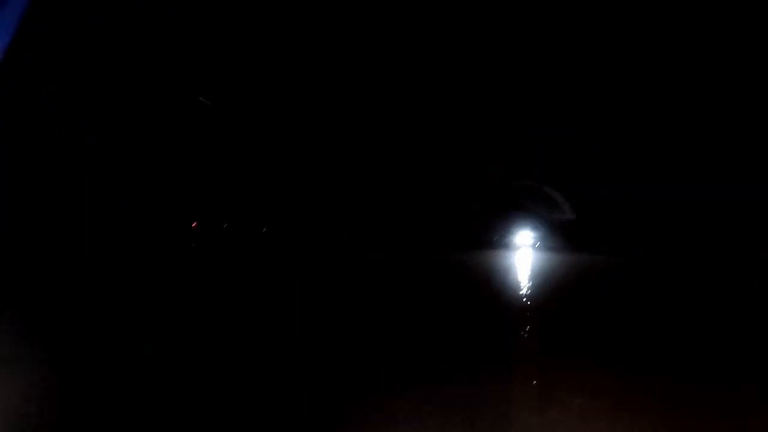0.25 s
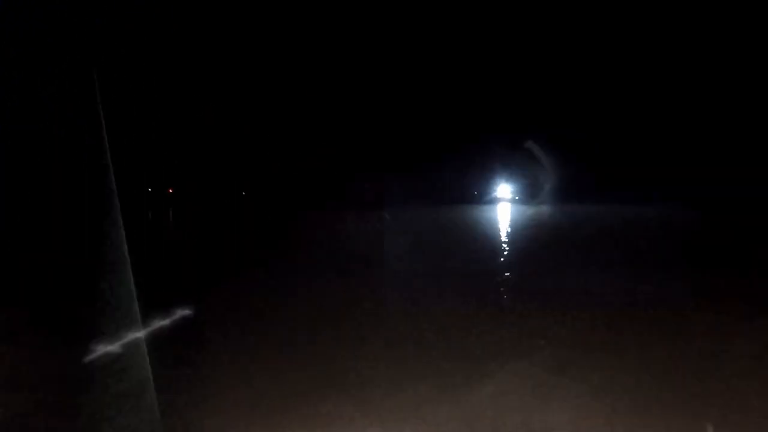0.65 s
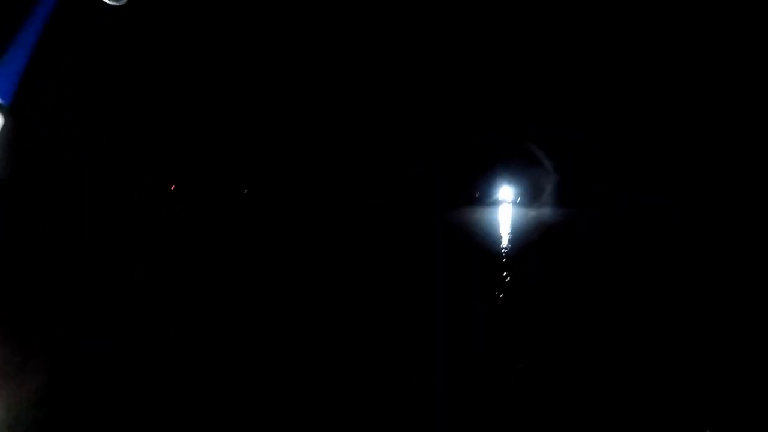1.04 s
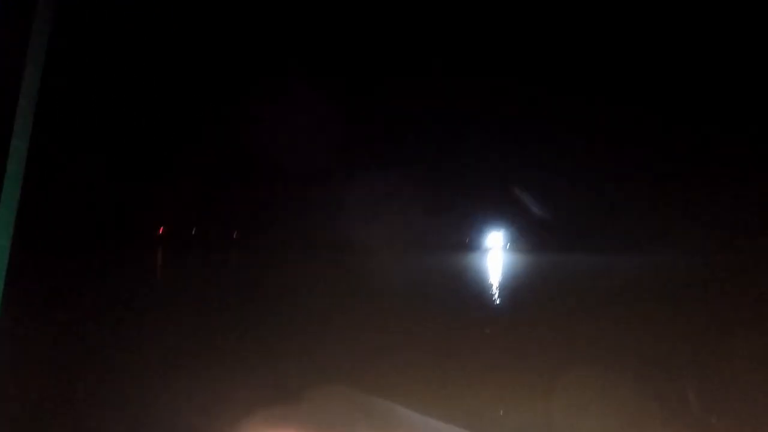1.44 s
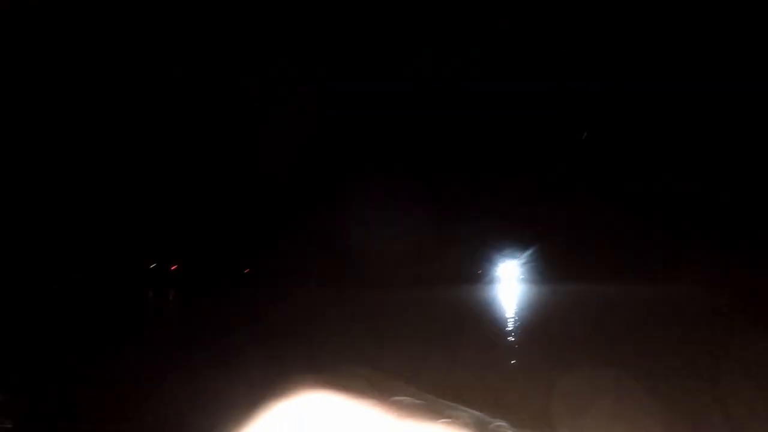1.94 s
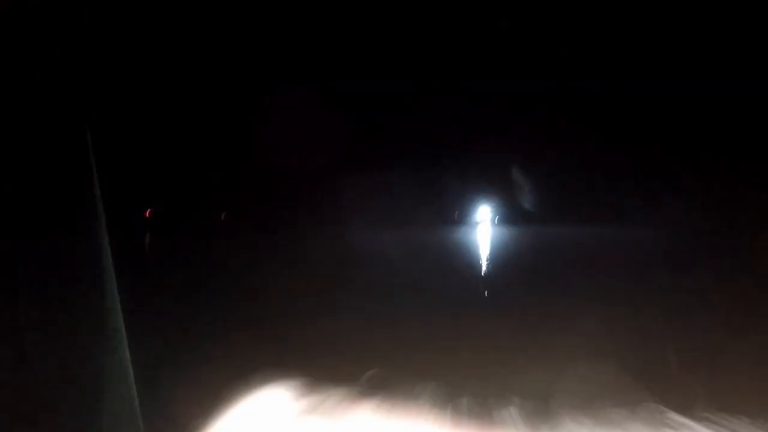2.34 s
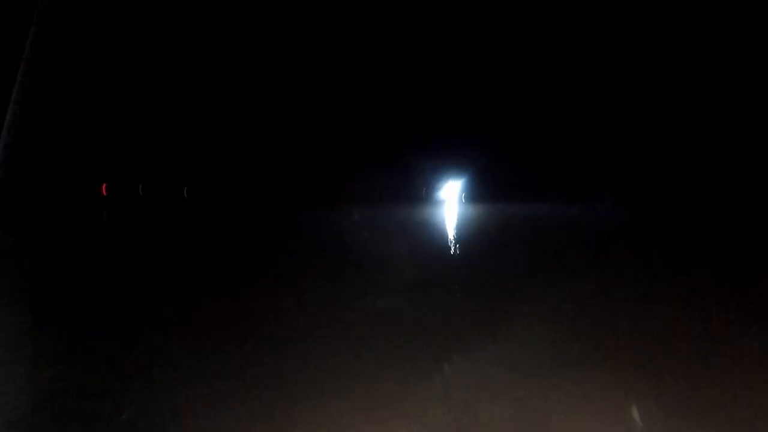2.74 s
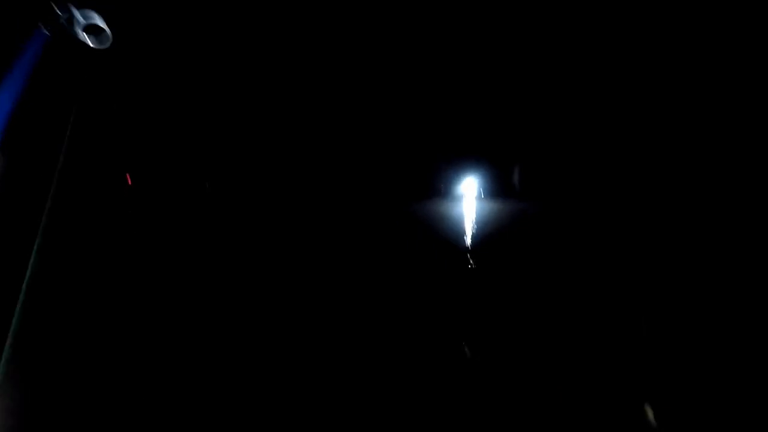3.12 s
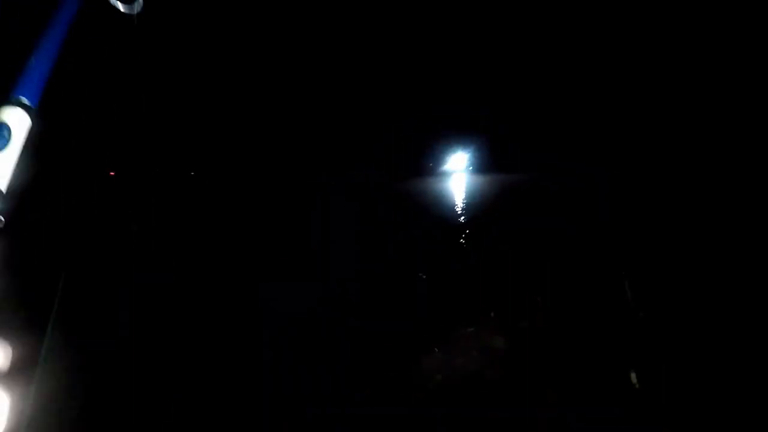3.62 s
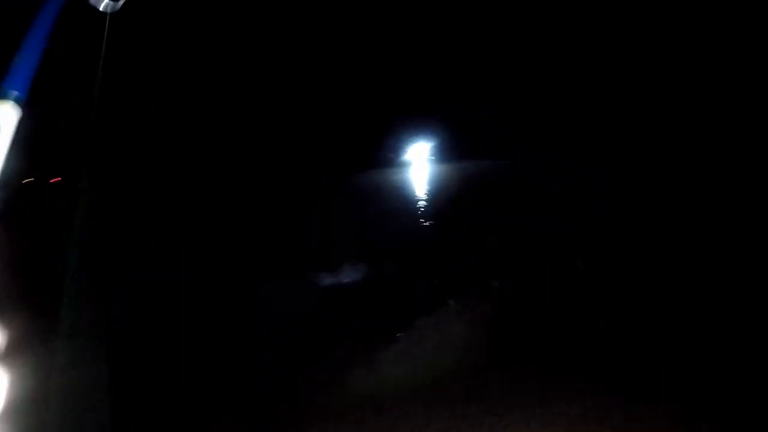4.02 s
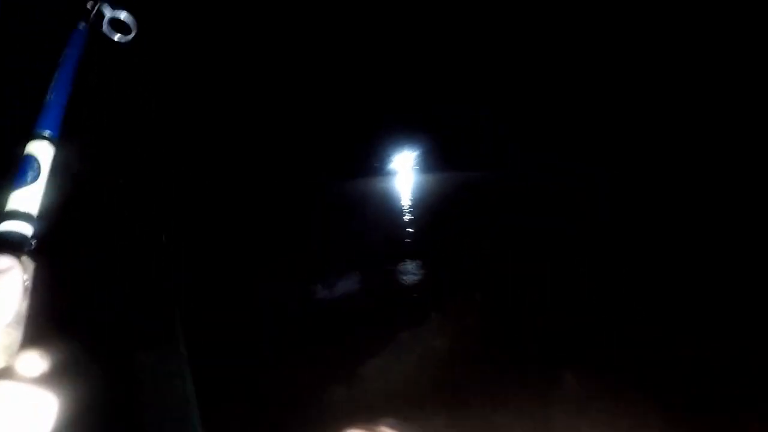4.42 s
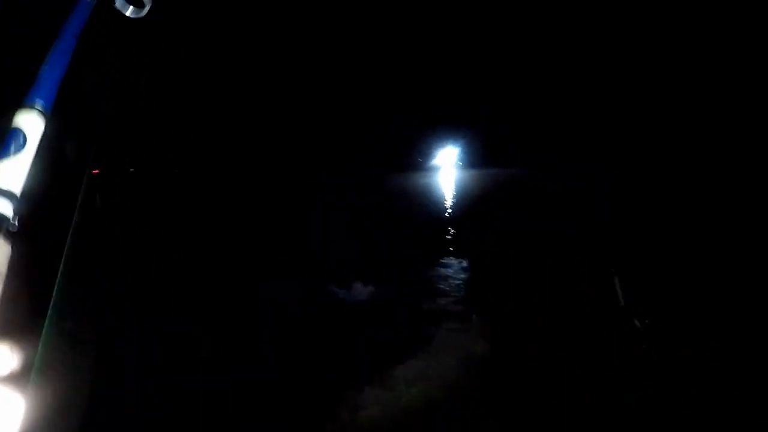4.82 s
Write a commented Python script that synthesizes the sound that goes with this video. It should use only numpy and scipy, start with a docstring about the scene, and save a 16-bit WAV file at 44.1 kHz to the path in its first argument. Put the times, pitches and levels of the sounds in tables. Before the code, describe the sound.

Outdoors at night by the water, bright thin metal chatter from a reel dominates, with line hissing softly through the rod rings. Fingers scuff and bump the camera, low and muffled. Sharp catches snap singly at first, more often after three seconds. In the last second or so, bubbles plop, wavelets lap and drops trickle. Behind lie a steady beating boat hum, a high insect drone and slight low wind puffs.

```python
"""A fishing reel is wound close by at night: its loose metal parts chatter as decaying modes, its catches snap.
Line hisses through the rod rings as grainy noise and the spool squeals once in two wavering tones.
Fingers scuff and knock a hand-held camera; water plips, laps and trickles at the bank as rising bubbles.
Behind, a far boat engine hums in beating tones, insects drone high as filtered noise, and a breeze puffs."""
import sys
import numpy as np
from scipy.fft import rfft, irfft, next_fast_len
from scipy.io import wavfile
from scipy.ndimage import map_coordinates

SR = 44100
rng = np.random.default_rng(int(sys.argv[2]) if len(sys.argv) > 2 else 0)


def digitize_waveform(pressure):
    """Quantize a signal to 16-bit integers and store it at the path in sys.argv[1].

    Rows of a 2-D input are taken as channels; values are limited to [-1, 1].
    """
    field = np.atleast_2d(pressure).T
    bounded = np.clip(field, -1, 1)
    quanta = np.round(bounded * 32767).astype(np.int16)
    wavfile.write(sys.argv[1], SR, quanta)


N = 223399


def amp(db):
    """Decibels to gain."""
    return 10 ** (np.asarray(db) / 20)


def unit(x):
    """Scale to rms 1."""
    return x / np.sqrt(np.mean(x ** 2) + 1e-20)


def along(points, hz):
    """Interpolate (Hz, value) points on a log frequency axis."""
    f, v = np.transpose(points)
    return np.interp(np.log(hz + 1), np.log(f + 1), v)


def wobble(knots_per_s):
    """Smooth random curve through normal-distributed knots."""
    knots = rng.standard_normal(int(N * knots_per_s / SR) + 4)
    return map_coordinates(knots, [np.arange(N) * knots_per_s / SR])


def filtered(x, response):
    """Apply a gain that is a function of frequency in Hz."""
    n = x.shape[-1]
    m = next_fast_len(2 * n)
    return irfft(rfft(x, m) * response(np.fft.rfftfreq(m, 1 / SR)), m)[..., :n]


def rush(spectrum, alike, grain_db=0):
    """Shaped stereo noise of rms 1, left-right correlation set by alike; grain_db makes the level flutter."""
    pair = rng.standard_normal((2, N)) * amp(grain_db * wobble(400))

    def mid_side_gain(hz):
        turn = np.arccos(np.clip(along(alike, hz), -1, 1)) / 2
        return amp(along(spectrum, hz)) * [np.cos(turn), np.sin(turn)]

    mid, side = filtered(pair, mid_side_gain)
    return unit(np.array([mid + side, mid - side]))


def fade(t, t60):
    """Free decay by 60 dB in t60 seconds."""
    return np.exp(-np.log(1000) * t / t60)


def swell(s, rise_s, fall_s):
    """Envelope that climbs as a half bell to 1 at time s, then decays exponentially."""
    t = np.arange(N) / SR - s
    return np.exp(-(np.minimum(t, 0) / rise_s) ** 2 - np.maximum(t, 0) / fall_s)


def humps(rows):
    """Sum of bells from rows of centre in seconds, level in dB, half length to 1/e in seconds."""
    t = np.arange(N) / SR
    return sum(amp(db) * np.exp(-((t - s) / length_s) ** 2) for s, db, length_s in rows)


def add(out, s, sound, pan_db=0):
    """Mix a short sound into the stereo track at time s; pan_db is left minus right."""
    part = out[:, max(round(s * SR), 0):][:, :sound.shape[-1]]
    part += (sound * amp([[pan_db / 2], [-pan_db / 2]]))[:, :part.shape[1]]


def winding_effort_db():
    """Relative briskness of the winding, which drives loose chatter and line hiss."""
    # Each row: time in seconds, relative effort in dB.
    winding = [(0.0, -37), (0.32, -33), (0.61, -32.5), (1.17, -31.5), (1.52, -43), (1.81, -50),
               (2.12, -35.5), (2.41, -30.5), (2.64, -30), (2.89, -32), (3.27, -32.5), (3.47, -31.5),
               (3.68, -32.5), (3.85, -44), (3.94, -41), (4.17, -33), (4.36, -31.5), (4.74, -38),
               (5.07, -32)]
    s, effort_db = np.transpose(winding)
    return np.interp(np.arange(N) / SR, s, effort_db)


def brief_dips(depth_db=-21):
    """Gain with brief dips for the rattle and line hiss, some just after a loud knock or snap."""
    # Each row: centre in seconds, half length in seconds.
    dips = [(0.186, 0.019), (0.349, 0.0063), (2.341, 0.015), (2.962, 0.0082), (3.247, .009), (3.513, 0.019),
            (3.613, 0.013), (4.06, 0.017), (4.125, 0.0076)]
    return amp(depth_db * humps([(s, 0, length_s) for s, length_s in dips]))


def clink(centre_hz, focus_db=11, scatter_db=3, port_spread=0.23):
    """One metal contact of peak 1: the spot struck favours the modes near centre_hz."""
    # Modes of the reel. Each row: frequency in Hz, relative level in dB, t60 in seconds.
    metal = [(3768, -10.5, 0.053), (4047, -9.5, 0.094), (4287, 4, 0.012), (4770, 1, 0.017),
             (5210, -14.5, 0.0091), (5960, -5.5, 0.0091), (6380, -6, 0.061), (7310, -6, 0.0083),
             (9530, -22.5, 0.065), (12200, -30, 0.04), (12860, -38, 0.05), (14400, -46, 0.04)]
    t = np.arange(SR // 20) / SR
    hz, db, t60 = np.transpose(metal)[:, :, None]
    size, detune, phase, skew = rng.standard_normal((4, len(metal), 1))
    gain = amp(db + scatter_db * size + focus_db * np.exp(-((hz - centre_hz) / 450) ** 2))
    # parts seat differently each time; heavily damped modes shift most
    seat_spread_hz = 22 + 260 * np.exp(-t60 / 0.028)
    angle = 2 * np.pi * ((hz + detune * seat_spread_hz) * t + phase)
    ring = gain * fade(t, t60) * (1 - np.exp(-(t / 0.0004) ** 2))
    pair = np.array([np.sum(ring * np.sin(angle + side * port_spread * skew), 0) for side in (1, -1)])
    return pair / np.abs(pair.mean(0)).max()


def reel():
    """Loose parts chatter with the winding; at each jolt one strikes hard, bounces and shakes the rest."""
    # Each row: time in seconds, peak in dB, strongest frequency in Hz.
    jolts = [(0.033, -21.5, 4900), (0.098, -26, 4080), (0.2285, -21, 4050), (0.3845, -18.5, 3940),
             (0.4207, -20.5, 4020), (0.4498, -25, 4020), (0.476, -22.5, 4830), (0.4812, -17, 4040),
             (0.5413, -13, 4000), (0.6207, -14, 4060), (0.6759, -13.5, 4570), (0.7147, -26.5, 4100),
             (0.7263, -12.5, 4100), (0.741, -20.5, 6260), (0.752, -20, 6160), (0.7818, -19, 4150),
             (0.835, -11.5, 4100), (0.9003, -21.5, 4030), (0.9369, -20.5, 6600), (0.975, -21.5, 6400),
             (0.993, -18.5, 3900), (1.0119, -22, 3950), (1.0173, -17.0, 3780), (1.0265, -25, 3830),
             (1.0612, -19, 4040), (1.105, -24.5, 4060), (1.1433, -20, 4060), (1.1557, -16, 4600),
             (1.1633, -15, 4400), (1.2054, -23.5, 4040), (1.216, -20.0, 4050), (1.249, -23, 4020),
             (1.2579, -13.5, 4050), (1.2668, -21, 4400), (1.28, -19, 4300), (1.331, -19, 4120),
             (1.3692, -19.5, 4100), (1.4497, -31, 4060), (1.483, -19.5, 4530), (1.503, -26.5, 4060),
             (1.5354, -27.0, 4040), (1.594, -31, 4160), (1.6315, -33, 4100), (1.6895, -29.5, 4130),
             (1.7188, -28.5, 4550), (1.7918, -23.5, 4060), (1.8097, -28.5, 4130), (1.84, -30, 4100),
             (1.9039, -28, 4670), (2.0102, -29, 4070), (2.1096, -23.5, 4060), (2.147, -25, 4180),
             (2.1865, -18.5, 4700), (2.2094, -20, 4970), (2.2517, -16.0, 4700), (2.2553, -17, 4140),
             (2.2677, -20, 4780), (2.3096, -16.5, 4180), (2.4014, -23, 4100), (2.43, -18, 4040),
             (2.4407, -12.5, 4950), (2.4925, -14.5, 4070), (2.5005, -20, 4690), (2.511, -24.5, 4080),
             (2.548, -10, 4900), (2.5917, -20.0, 4660), (2.5994, -17.5, 4860), (2.6264, -11.5, 6300),
             (2.6319, -11, 4770), (2.6397, -29, 4000), (2.6652, -22, 4090), (2.672, -16.5, 4870),
             (2.6766, -16.5, 4980), (2.6808, -19, 5000), (2.7044, -14.5, 4160), (2.7398, -18.5, 4020),
             (2.7507, -17, 3980), (2.767, -13.5, 5000), (2.7912, -12.5, 4610), (2.7956, -12, 4590),
             (2.7992, -17, 4940), (2.842, -18.5, 4100), (2.9335, -20, 3970), (2.9842, -20.5, 3900),
             (3.0356, -22, 4050), (3.049, -17, 4100), (3.0558, -18.5, 4060), (3.0926, -20, 4370),
             (3.0979, -17, 4230), (3.103, -17, 4700), (3.1173, -18.5, 4870), (3.1618, -21.5, 4050),
             (3.184, -21.5, 3990), (3.214, -17, 4200), (3.2319, -20.0, 4240), (3.2984, -23.5, 4060),
             (3.3343, -18.5, 4880), (3.39, -18, 4870), (3.4637, -22, 4480), (3.4743, -13.5, 4000),
             (3.486, -16, 4020), (3.5524, -18.5, 4730), (3.6318, -26, 4050), (3.642, -18, 4460),
             (3.6514, -16.5, 4000), (3.6692, -16.5, 4080), (3.755, -18.0, 3950), (3.839, -22, 4000),
             (3.9042, -21, 6440), (3.9137, -15.5, 4060), (3.9313, -14.5, 4330), (3.9356, -16.5, 4390),
             (3.9992, -17.5, 4260), (4.1499, -21.0, 4320), (4.1774, -12.5, 4570), (4.2244, -18, 4540),
             (4.2651, -15, 4400), (4.27, -14, 4640), (4.3145, -15.5, 4000), (4.39, -21, 4640),
             (4.4523, -17.5, 4570), (4.5675, -12.5, 4180), (4.6357, -20, 4060), (4.7583, -10, 4460),
             (4.9244, -19.5, 3830), (4.9579, -12.5, 4780)]
    chatter_db, uneven_db, uneven_knots_per_s = -5, 2, 28
    contacts_per_s, size_db = 560, 5.0
    flurry_db, flurry_rise_s, flurry_fall_s = -42.5, 0.0025, 0.014  # level after an average jolt
    flurry_db_per_jolt_db = 0.97
    bounce_db, bounce_gap_s = -10, 0.0046  # loss and mean flight time of each rebound
    busy_db = -30  # shaking with all parts in motion; contacts thin out below it
    low_edge_hz = 3500  # small parts radiate no lows

    ticks, chatter = np.zeros((2, 2, N))
    shaking = amp(winding_effort_db() + chatter_db + uneven_db * wobble(uneven_knots_per_s))
    average_db = np.mean(jolts, axis=0)[1]
    for s, db, hz in jolts:
        add(ticks, s, amp(db) * clink(hz))
        delays_s = np.cumsum(bounce_gap_s * (.5 + rng.random(2)))
        for k, delay_s in enumerate(delays_s, 1):
            add(ticks, s + delay_s, amp(db + k * bounce_db) * clink(hz))
        flurry = amp(flurry_db + flurry_db_per_jolt_db * (db - average_db))
        shaking = np.hypot(shaking, flurry * swell(s + bounce_gap_s, flurry_rise_s, flurry_fall_s))
    shaking = shaking * brief_dips()

    busy = np.minimum(shaking / amp(busy_db), 1)
    for when, size, spot, chance in rng.random((int(contacts_per_s * N / SR), 4)):
        share = busy[int(when * N)]
        if chance < share:
            contact = clink(3900 + 1100 * spot, focus_db=7.5)
            gain = amp(-size_db * np.log(size + 0.1)) / np.sqrt(share)
            add(chatter, when * N / SR, gain * contact)
    rattle = ticks + shaking * unit(chatter)
    return filtered(rattle, lambda hz: 1 / np.hypot(1, (low_edge_hz / (hz + 1)) ** 10))


def line():
    """Line hisses through the rings with the winding, more as it tightens and at each tug."""
    # Each row: frequency in Hz, relative density in dB per Hz.
    hiss = [(300, -32), (900, 2), (1300, -1.5), (2000, -2), (3000, -1.5), (4500, 5), (6500, 8), (8000, -5),
            (9700, -10), (11000, -27), (12800, -13), (14500, -44)]
    # Quick pulls. Each row: centre in seconds, level in dB before the trim, half length in seconds.
    tugs = [(.76, -39, 0.011), (1.07, -40.5, 0.013), (1.37, -41.5, 0.033), (2.06, -44, 0.086),
            (2.265, -38.5, 0.017), (2.72, -31.5, 0.017), (3.14, -46, 0.014), (3.72, -38, 0.017),
            (3.87, -38.5, 0.2), (4.22, -34, 0.059), (4.52, -39, 0.071), (4.96, -39.5, 0.051)]
    trim_db, running_db, effort_slope, tighten_db_per_s = 6, -49, 1.49, 1
    t = np.arange(N) / SR
    effort_db = winding_effort_db()
    effort_change_db = effort_slope * (effort_db - effort_db.mean())
    running = amp(running_db + effort_change_db + tighten_db_per_s * (t - t.mean()))
    level = np.hypot(running * brief_dips(), humps(tugs))
    return amp(trim_db) * level * rush(hiss, [(1000, 0.2)], grain_db=4.0)


def boat():
    """Neighbouring engine tones beat against each other over a soft rumble."""
    # Each row: frequency in Hz, mean level in dB rms.
    engine = [(155.4, -48), (161.5, -42), (174.3, -40.5), (183, -43.5), (257.1, -61.5), (366.1, -52),
              (484.5, -52.5), (604.9, -63.5), (968.3, -58), (983.8, -58), (1209.9, -61.5)]
    # Engine rumble and night air. Each row: frequency in Hz, relative density in dB per Hz.
    rumble = [(25, -38), (100, -56), (125, -14.5), (165, -3), (195, -5.5), (225, -6.5), (255, -11),
              (370, -9.5), (540, -13.5), (780, -20.5), (1100, -19), (1900, -26.5), (7000, -28),
              (11000, -48.5), (15000, -60)]
    # Each row: frequency in Hz, left-right correlation.
    air_alike = [(40, .3), (170, 1), (400, 0.68), (700, 0.027), (1200, 0.1), (9000, 0.06)]
    drift_hz, tone_wobble_db, rumble_db, rumble_wobble_db = 0.23, 2.32, -37, 1.1
    t = np.arange(N) / SR
    hum = np.zeros((2, N))
    for hz, db in engine:
        drift_cycles = np.cumsum(drift_hz * wobble(5.03)) / SR
        angle = 2 * np.pi * (hz * t + rng.random() + drift_cycles)
        level = np.sqrt(2) * amp(db + tone_wobble_db * wobble(4.126))
        hum += level * np.sin(angle + np.array([[.25], [-.25]]))
    return hum + amp(rumble_db + rumble_wobble_db * wobble(8.4)) * rush(rumble, air_alike)


def insects(level_db=-43, wobble_db=0.78):
    """A chorus of insects: high band noise with a slightly wavering level."""
    # Each row: frequency in Hz, relative density in dB per Hz.
    chorus = [(3300, -71), (4000, -50), (4700, -8), (5300, -20), (5900, 4.5), (6400, 0), (7100, -33),
              (9000, -50)]
    return amp(level_db + wobble_db * wobble(7.9)) * rush(chorus, [(6000, 0.022)])


def breeze(trim_db=-2, calm_db=-64):
    """Faint breeze on the microphone ports: low noise with puffs over a calm floor, trimmed together."""
    # Each row: centre in seconds, level in dB before the trim, half length in seconds.
    puffs = [(.1, -46.5, 0.82), (.84, -53, .06), (1.87, -52, 0.072), (2.7, -60, 0.37)]
    air = rush([(20, -2), (65, 5), (130, -5.0), (400, -58)], [(50, 0.46)])
    return amp(trim_db) * (amp(calm_db) + humps(puffs)) * air


def snaps():
    """Hard plastic catches: a sharp edge, then brief crackle with its own ring and body; harder is brighter."""
    # Each row: time in seconds, peak in dB, crackle t60 in seconds, pan L-R in dB, ring in Hz, low body in dB.
    catches = [(0.177, -12.5, 0.012, -1, 4330, 9.5), (0.8452, -15.5, 0.02, 0, 3300, 6),
               (1.3511, -5, 0.014, -1, 6600, -16), (2.383, -23, 0.023, -2, 3550, -9),
               (3.141, -10.5, 0.029, 0, 7100, 0.5), (3.266, -11, 0.036, 1, 5950, 5.5),
               (3.395, -8.5, 0.038, 4, 5760, 1.5), (3.465, -17, 0.046, 6, 3700, 7),
               (3.9687, -7.5, 0.014, 4, 5400, -2), (3.973, -7.5, 0.043, 1, 5500, -6),
               (4.0326, 0.5, 0.011, -3.5, 4300, 6), (4.1, -17, 0.024, 3, 5430, 5.5),
               (4.6513, -9, 0.027, 4, 5460, -1.5), (4.972, -7, 0.0077, 4, 5750, -11)]
    # Each row: frequency in Hz, relative density in dB per Hz.
    snap_tone = [(60, -29), (200, -7), (450, -11), (1000, -13), (3200, -3), (4200, 3), (6200, 5.5),
                 (7800, -5), (10300, -18.5), (11700, -39), (13000, -35), (15000, -40)]
    crackle, ring_db, ring_width_hz, body_hz = 0.39, 6, 450, 3000
    out, t = np.zeros((2, N)), np.arange(-SR // 200, SR // 25) / SR
    average_db = np.mean(catches, axis=0)[1]
    for s, db, t60, pan_db, ring_hz, body_db in catches:
        shared, left, right = rng.standard_normal((3, len(t)))
        grit = shared + 1.2 * np.array([left, right])
        tail = crackle * np.sqrt(t60 / 0.012) * grit * fade(np.abs(t), t60) * (t > 0)
        push = tail + (t == 0)

        def tone(hz):
            ring = ring_db * np.exp(-((hz - ring_hz) / ring_width_hz) ** 2)
            body = body_db / (1 + (hz / body_hz) ** 8)
            top = along([(10000, 0), (13000, db - average_db)], hz)
            return amp(along(snap_tone, hz) + ring + body + top)

        snap = filtered(push, tone)
        add(out, s + t[0], amp(db) * snap / np.abs(snap).max(), pan_db)
    return out


def fingers(leak_db=-13):
    """Fingers flex the camera's case, which pushes its two microphones opposite ways."""
    # Each row: centre in seconds, level in dB, half length in seconds.
    scuffs = [(0.236, -29, 0.012), (0.832, -25.5, 0.015), (1.181, -36, 0.048), (1.854, -34, 0.02),
              (2.209, -29, 0.009), (2.325, -19, 0.01), (2.528, -30, 0.011), (2.922, -20.5, 0.0068),
              (3.568, -27.5, 0.0076), (4.374, -29.5, 0.011), (4.569, -28.5, 0.02), (4.845, -26, 0.015)]
    # Each row: frequency in Hz, relative density in dB per Hz.
    scuff_tone = [(50, -20), (105, -37), (140, 11), (225, 12), (280, -33), (340, 13.5), (450, 9),
                  (660, 5.5), (820, -18), (1300, -19), (3000, -55)]
    flex, air = rush(scuff_tone, [(300, 0.0072)])
    return humps(scuffs) * (flex * [[1], [-1]] + amp(leak_db) * air)


def plips():
    """Each bubble opens with a spattering slap and climbs in pitch as it nears the surface."""
    # Each row: time in seconds, level in dB, starting pitch in Hz, t60 in seconds, pan L-R in dB.
    drops = [(0.8449, -11.5, 1186, 0.025, 0.5), (1.351, -23, 1316, 0.044, -7),
             (2.523, -19.5, 1190, 0.018, 4), (3.396, -23.5, 1220, 0.022, 7), (3.631, -25, 1150, 0.028, -2),
             (4.1995, -12.5, 2000, 0.0065, -4.5), (4.214, -25, 2300, 0.016, -4), (4.254, -18, 423, 0.03, 0),
             (4.3298, -7.5, 447, 0.028, -1), (4.392, -22, 620, 0.033, -6), (4.512, -23, 2130, 0.016, -3),
             (4.661, -25.5, 980, 0.044, 2), (4.809, -23, 1070, 0.028, 5), (4.872, -8.5, 290, 0.035, -1),
             (4.883, -23, 1600, 0.031, -9), (4.903, -18, 598, 0.034, -10), (4.931, -19, 1960, 0.018, -5)]
    slap, spatter_db, slap_top_hz = 0.32, 4, 4000
    rise = 0.33  # fractional pitch climb per t60
    out, t = np.zeros((2, N)), np.arange(SR // 10) / SR
    for s, db, hz, t60, pan_db in drops:
        def slap_band(f):
            low_cut = 1 / np.hypot(1, (0.53 * hz / (f + 1)) ** 4)
            return low_cut / np.hypot(1, f / hz) / (1 + (f / slap_top_hz) ** 4)

        spatter = rng.standard_normal(len(t)) * amp(spatter_db * wobble(540)[:len(t)])
        noise = unit(filtered(spatter, slap_band))
        bubble = np.sin(2 * np.pi * hz * t * (1 + rise * t / t60 / 2))
        splash = slap * (0.018 / t60) ** 2  # short-lived bubbles burst as noise
        sound = (bubble + splash * noise) / np.hypot(1, splash)
        envelope = fade(t, max(t60, .02)) * (1 - np.exp(-t * hz))  # decay no shorter than 20 ms
        add(out, s, amp(db) * sound * envelope, pan_db)
    return out


def case_knocks(port_phase_rad=1.16, rocking_hz=1500):
    """A knock rings the case; its low modes rock the two microphones out of step."""
    # Each row: time in seconds, level in dB, hardness (upper limit of the modes excited) in Hz.
    bumps = [(2.3262, -1, 5000), (2.91, -7, 259)]
    # Modes of the case. Each row: frequency in Hz, relative level in dB, t60 in seconds.
    case = [(218.6, -4, 0.13), (316, -14.5, 0.099), (523, -20, 0.03), (710, -21.5, 0.032),
            (1330, -15.5, 0.02), (1560, -16, 0.028), (2000, -14, 0.028), (2460, -29, 0.014)]
    out, t = np.zeros((2, N)), np.arange(SR // 6) / SR
    for s, blow_db, hard_hz in bumps:
        for hz, db, t60 in case:
            skew = np.array([[1], [-1]]) * port_phase_rad / np.hypot(1, hz / rocking_hz)
            ring = np.sin(2 * np.pi * hz * t + skew) * fade(t, t60) * (1 - np.exp(-t * hz * 2))
            add(out, s, amp(blow_db + db) * ring / (1 + (hz / hard_hz) ** 4))
    return out


def spool(squeal_hz=2622, lower_hz=1235, lower_db=-4):
    """The spool squeals once: a clean whistle over a rough, wavering lower tone."""
    # A peak on a longer swell. Each row: centre in seconds, level in dB, half length in seconds.
    squeal = [(3.845, -42, 0.091), (3.94, -51, 0.32)]
    whistle = np.sin(2 * np.pi * np.cumsum(squeal_hz + 2.0 * wobble(29.7)) / SR)
    lower = np.sin(2 * np.pi * np.cumsum(lower_hz + 60 * wobble(200)) / SR)
    return humps(squeal) * (whistle + amp(lower_db) * lower) * amp([[-1.5], [1.5]])


def bubbles(centre_hz, per_s, spread=0.35, cycles=6, size_db=3):
    """A stereo cloud of rms 1: small bubbles that each ring for a few rising cycles."""
    out, t = np.zeros((2, N)), np.arange(SR // 30) / SR
    count = int(per_s * N / SR)
    for when, (pitch, size, pan) in zip(rng.random(count), rng.standard_normal((count, 3))):
        hz = centre_hz * np.exp(spread * pitch)
        ring = np.sin(2 * np.pi * hz * t * (1 + 3 * t)) * fade(t, cycles / hz) * (1 - np.exp(-t * hz))
        add(out, when * N / SR, amp(size_db * size) * ring, 4 * pan)
    return unit(out)


def lapping(rise_s=0.015):
    """Wavelets run up the bank and drain: spray with small bubbles and droplets, gurgles with large bubbles."""
    # Each row: peak time in seconds, spray drive in dB, gurgle drive in dB, drain time to 1/e in seconds.
    wavelets = [(3.89, -37, -30, 0.059), (4.21, -37, -34, 0.0077), (4.258, -35, -30, 0.018),
                (4.33, -39.5, -38.5, 0.21), (4.40, -52, -36.5, 0.068), (4.52, -37, -42, 0.016),
                (4.56, -46.5, -43, 0.97), (4.79, -52, -35, 0.039), (4.89, -34, -33.5, 0.047)]
    # Each row: frequency in Hz, relative density in dB per Hz.
    spray_tone = [(150, -45), (500, -19), (1100, -25), (2200, 9), (3200, 6), (6000, -24), (10000, -25)]
    # Each row: frequency in Hz, relative density in dB per Hz.
    gurgle_tone = [(80, -55), (150, -33), (280, 9), (450, 0), (620, 2), (780, -19), (2000, -42),
                   (6000, -70)]
    spray = amp(-8) * rush(spray_tone, [(1000, 1.0)], grain_db=-1.0)
    fizz = amp(-3) * bubbles(centre_hz=1830, per_s=900, spread=0.29)
    droplets = amp(-7.0) * bubbles(centre_hz=1760, per_s=160, spread=0.302, cycles=30)
    gurgle = amp(-7) * rush(gurgle_tone, [(400, 1.0)])
    glugs = amp(-2) * bubbles(centre_hz=433, per_s=420, spread=0.28, cycles=9.8)
    high, low = spray + fizz + droplets, gurgle + glugs
    return sum(swell(s, rise_s, drain_s) * (amp(high_db) * high + amp(low_db) * low)
               for s, high_db, low_db, drain_s in wavelets)


def trickle():
    """Water drains off the bank in small drops, heard as a cloud of bubbles."""
    # Each row: centre in seconds, level in dB, half length in seconds.
    drain = [(4.55, -50, 0.27)]
    return humps(drain) * bubbles(centre_hz=620, per_s=340, spread=0.46, cycles=11, size_db=2)


def water(lowest_hz=210):
    """Plips, wavelets and a trickle at the bank; bubbles this small give no bass."""
    bank = plips() + lapping() + trickle()
    return filtered(bank, lambda hz: 1 / np.hypot(1, (lowest_hz / (hz + 1)) ** 4))


def scene():
    """Tackle and hands close by, river and bank behind."""
    tackle = reel() + line() + snaps() + spool()
    hands = fingers() + case_knocks()
    return tackle + hands + water() + boat() + insects() + breeze()


def record(dry, top_hz=15400):
    """Each microphone port has its own colour; nothing passes above the band limit."""
    # Each row: frequency in Hz, left minus right in dB.
    ports = [(60, 1.5), (350, 3.5), (700, 3), (1300, 2.5), (2600, 0), (4500, 1), (5600, 4), (6600, -2),
             (8000, -5), (9600, -12.5), (11000, 7), (14500, -8)]
    coloured = filtered(dry, lambda hz: amp(np.array([[.5], [-.5]]) * along(ports, hz)))
    return filtered(np.clip(coloured, -1, 1), lambda hz: hz < top_hz)


dry = scene()
out = record(dry)
digitize_waveform(out)
```